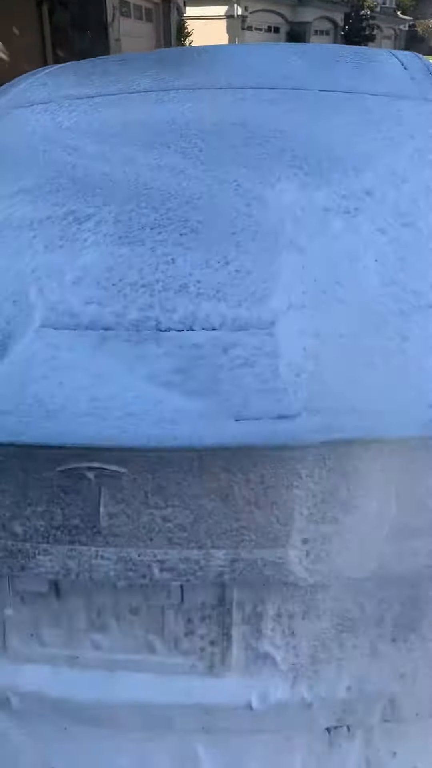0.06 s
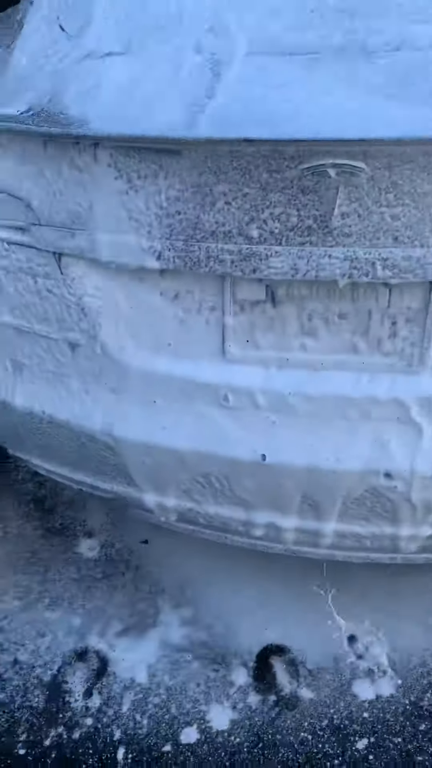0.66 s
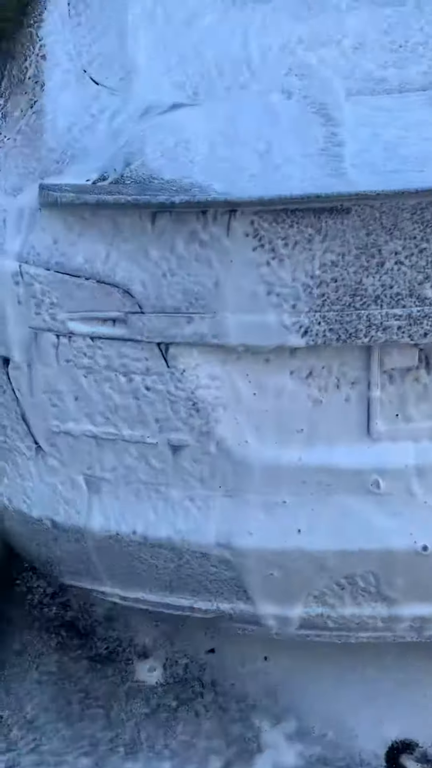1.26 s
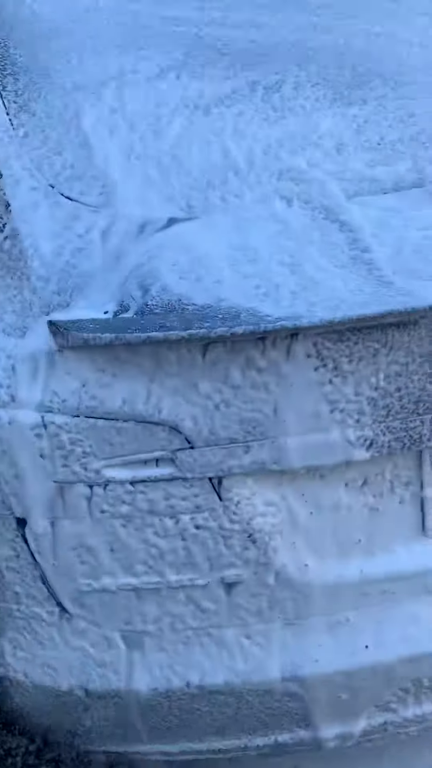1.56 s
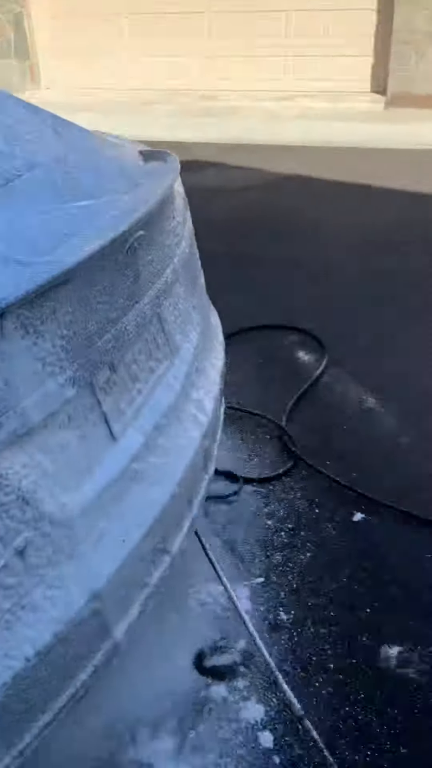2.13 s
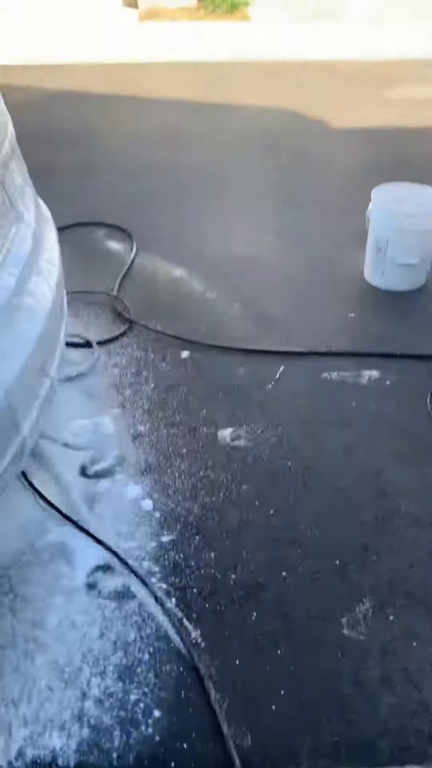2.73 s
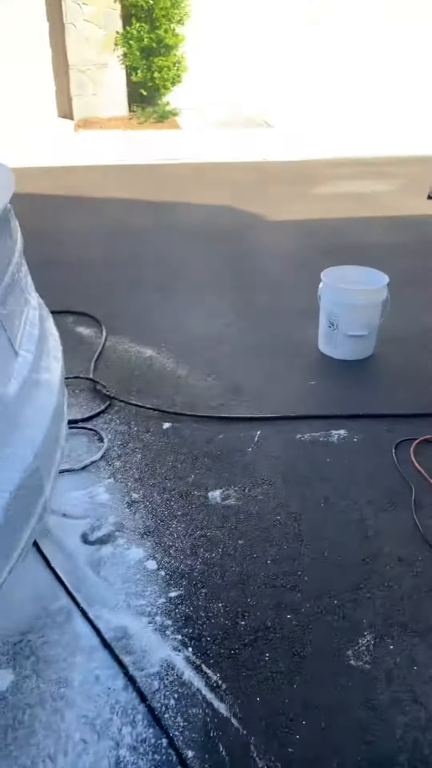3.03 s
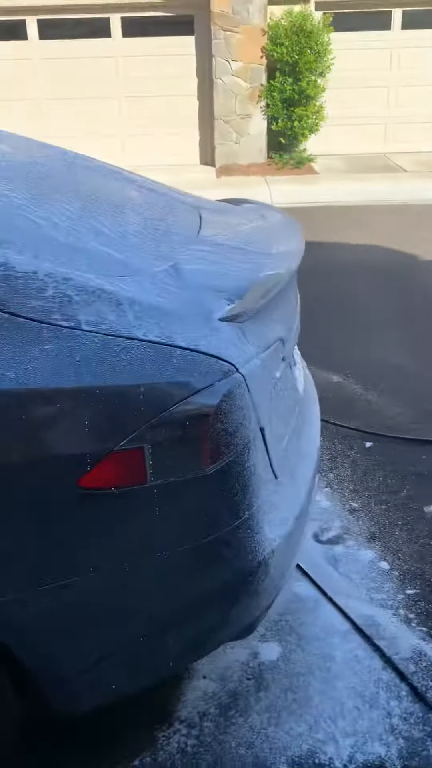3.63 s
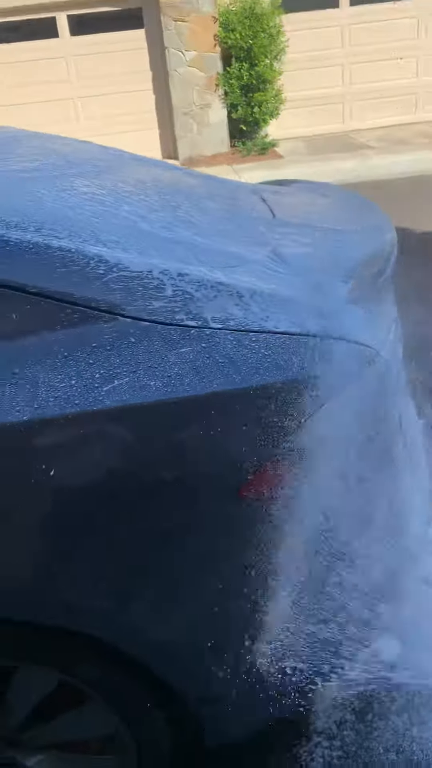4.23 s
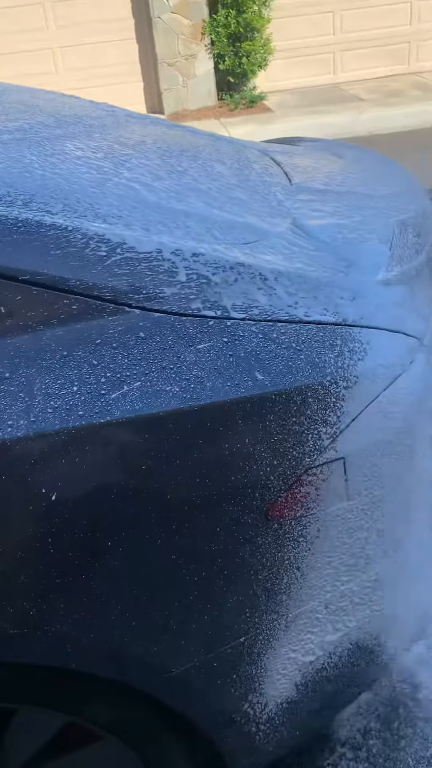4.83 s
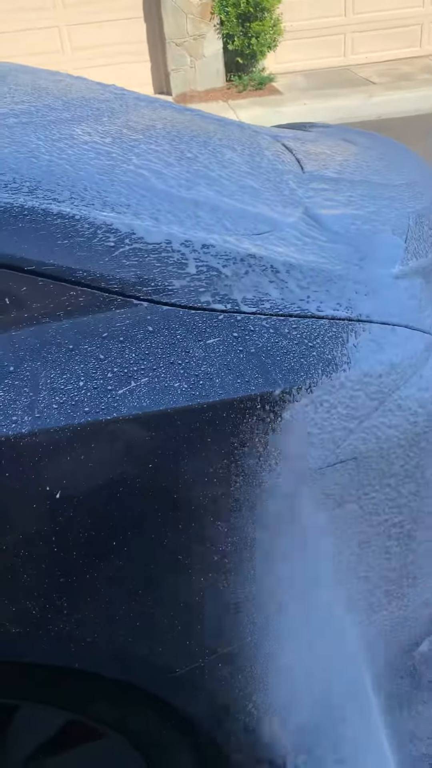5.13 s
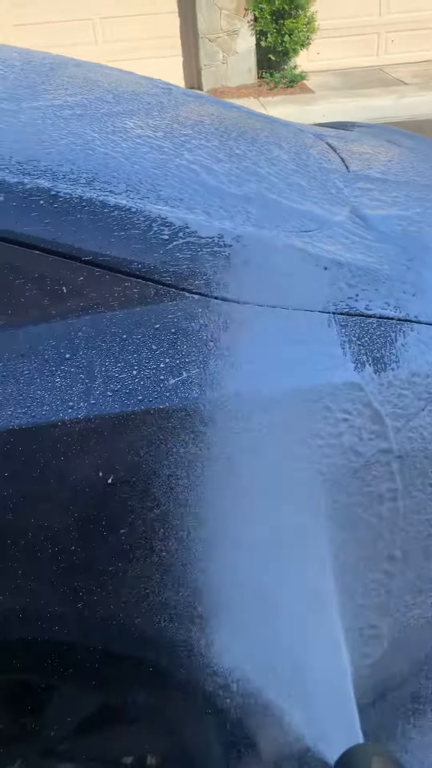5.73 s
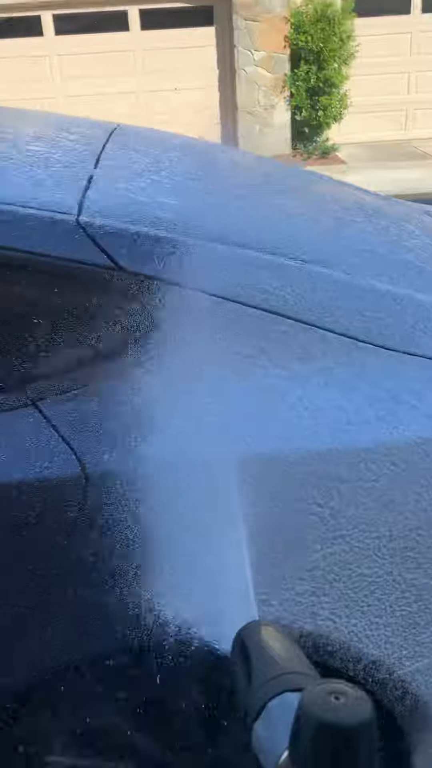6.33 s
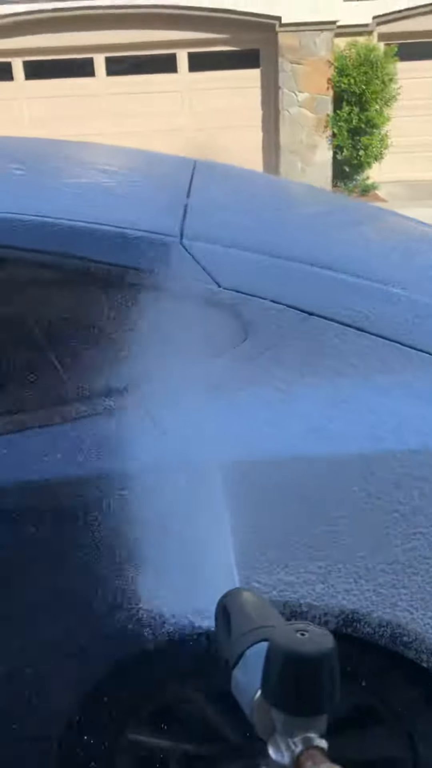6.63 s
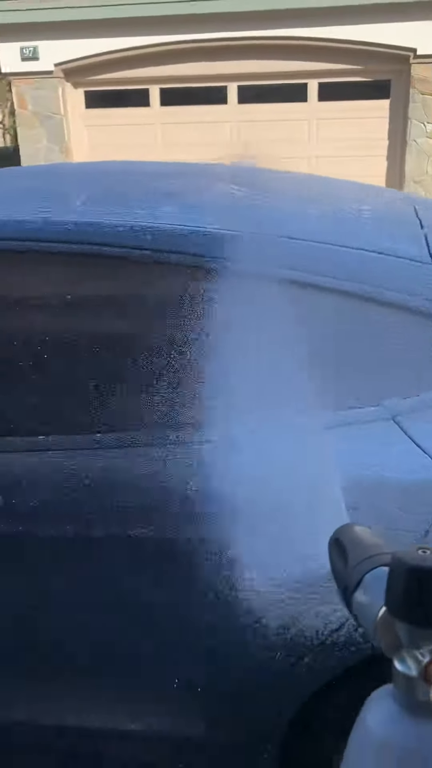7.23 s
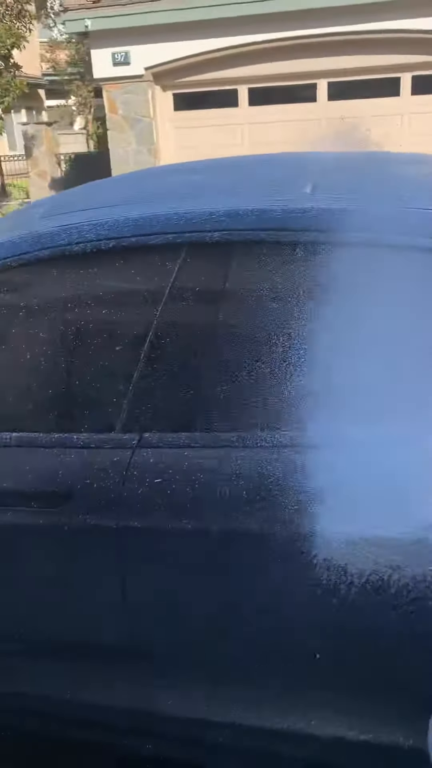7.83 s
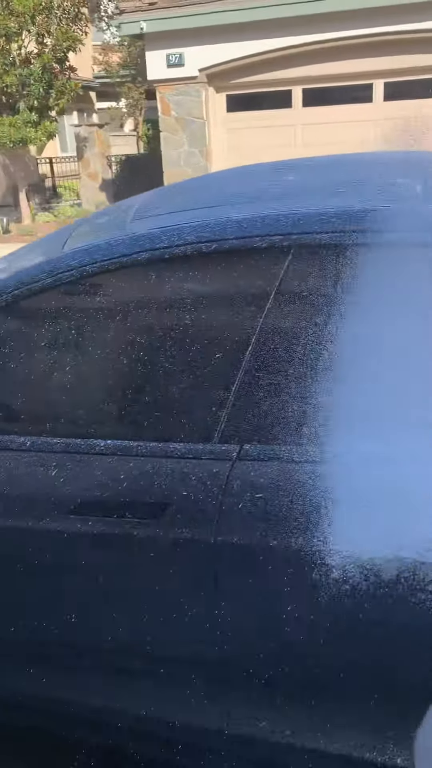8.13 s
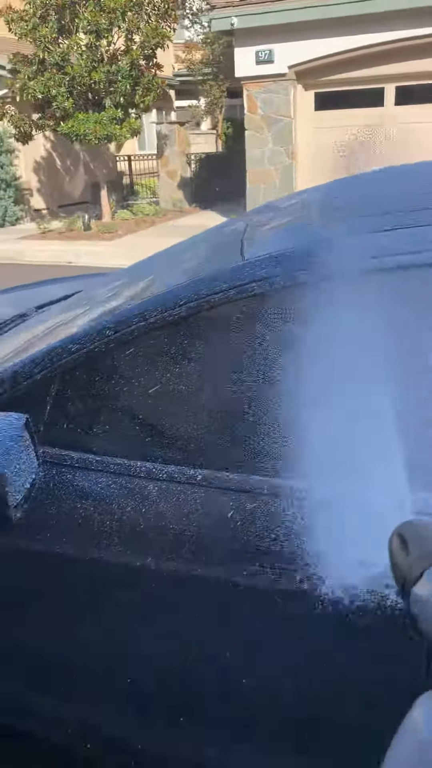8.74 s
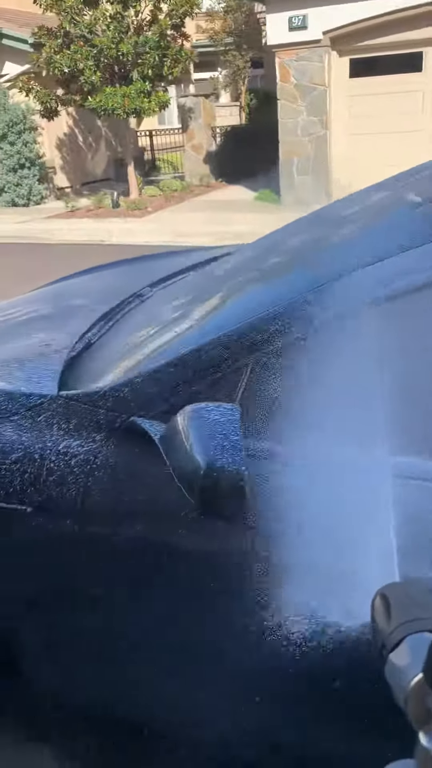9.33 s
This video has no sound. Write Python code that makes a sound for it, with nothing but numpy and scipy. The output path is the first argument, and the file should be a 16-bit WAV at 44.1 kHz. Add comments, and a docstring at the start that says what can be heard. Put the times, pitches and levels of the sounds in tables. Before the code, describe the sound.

A pressure washer sprays foam onto a car on a driveway, heard from just behind the nozzle: a midrange roar and bright hiss over a low thudding engine some way off. At about 0.4 seconds the spray cuts off with a short sputter. The engine runs slightly faster, surging about twice a second before gradually settling. In the pause, foam fizzes faintly, air softly bumps the microphone between 1 and 2 seconds, and shoes scuff the wet ground with small splatters from about 1.5 to 3 seconds. A few light clicks come near 2.7 seconds. At about 4.1 seconds the valve pops sharply and the jet starts again, while the engine slows back into its loaded thud. The spray roars, hisses and splashes on the panels, its tone shifting gently as it sweeps along the car, continuing to the end at about 9.4 seconds.

```python
"""A pressure washer lays foam on a car in a driveway, heard from just behind the lance.
First air and soap roar in the nozzle and the fan of foam hisses and splashes, over a thudding engine.
The trigger is let go: the relieved engine runs faster and smoother, its governor hunting at first.
On the walk round the car, foam fizzes, shoes scuff the wet ground and air bumps the microphone.
At about four seconds the valve pops, the jet sprays again and the engine slows under the load."""
import sys
import numpy as np
from scipy import signal
from scipy.fft import rfft, irfft, next_fast_len
from scipy.io import wavfile
from scipy.ndimage import uniform_filter1d, map_coordinates

SR = 44100
rng = np.random.default_rng(int(sys.argv[2]) if len(sys.argv) > 2 else 0)


def file_out(sig):
    """Save sig as 16-bit WAV at sys.argv[1]."""
    # one column per channel
    cols = np.atleast_2d(sig).T
    # limit, then scale
    lim = np.clip(cols, -1, 1)
    pcm = np.round(lim * 32767).astype(np.int16)
    wavfile.write(sys.argv[1], SR, pcm)


N = 413195
TIME = np.arange(N) / SR
RELEASE_S, PULL_S = 0.361, 4.1255  # the trigger is let go, and pulled again
SURGE_S, SURGE_PERIOD_S = .96, .468  # the governor's first full surge, and the time between surges


def amp(db):
    """Decibels to gain."""
    return 10 ** (np.asarray(db) / 20)


def unit(x):
    """x at rms 1."""
    return x / np.sqrt(np.mean(x ** 2) + 1e-20)


def bump(x, centre, width):
    """A bell of height 1."""
    return np.exp(-.5 * ((x - centre) / width) ** 2)


def swells(rows):
    """A gain envelope of bells, one per (peak_s, half_length_s, level_db) row."""
    return sum(amp(db) * bump(TIME, s, half_length) for s, half_length, db in rows)


def curves(rows, t=TIME):
    """Each column after the first, read at the times t."""
    times, *columns = np.transpose(rows)
    return [np.interp(t, times, column) for column in columns]


def wobble(rate):
    """A smooth random curve, rate knots a second."""
    knots = rng.standard_normal(int(N * rate / SR) + 4)
    steps = np.arange(0, N * rate / SR + 1, 1 / 8)
    return np.interp(TIME * rate, steps, map_coordinates(knots, [steps]))


def white():
    """Fresh white noise."""
    return rng.standard_normal(N)


def drops(rate, share):
    """White noise in which a share of the power comes as single drop impacts, rate a second."""
    hits = unit(white() * np.sqrt(rng.poisson(rate / SR, N)))
    return np.sqrt(share) * hits + np.sqrt(1 - share) * white()


def filtered(x, response):
    """x times a response of frequency."""
    size = next_fast_len(N + SR // 2)
    return irfft(rfft(x, size) * response(np.fft.rfftfreq(size, 1 / SR)), size)[:N]


def coloured(x, spectrum):
    """x at rms 1 through an EQ curve that falls steeply beyond its ends."""
    freqs, gains_db = np.transpose(spectrum)

    def response(hz):
        gain = amp(np.interp(np.log(hz + 1), np.log(freqs + 1), gains_db))
        return gain / (1 + (freqs[0] / (hz + 1) / 1.2) ** 8) / (1 + (hz / freqs[-1] / 1.2) ** 8)
    return unit(filtered(x, response))


def swept(x, shape_db, patchy_db):
    """x at rms 1 through a moving EQ shape_db(hz, t), with the drifting patches of close reflections."""
    hz, t, frames = signal.stft(x, SR, nperseg=2048)
    patches = uniform_filter1d(rng.standard_normal(frames.shape), size=3, axis=0)
    patches = unit(uniform_filter1d(patches, size=21, axis=1))
    frames *= amp(shape_db(hz[:, None], t) + patchy_db * patches)
    return unit(signal.istft(frames, SR, nperseg=2048)[1][:N])


# narrow peaks and notches as the lance passes the car: peak_s, half_length_s, centre_hz, gain_db
PASSING_PEAKS = [(5.15, .15, 1130, 5), (5.15, .25, 1670, -6), (6.35, .12, 1320, 6), (6.72, .12, 880, 5),
                 (7.25, .18, 1785, 6), (7.75, .12, 1785, 5), (8.3, .13, 2060, 4), (8.6, .25, 1770, -5),
                 (8.9, .4, 950, -6), (7.5, .12, 3990, 6), (7.55, .15, 3410, -7), (7.68, .1, 3325, 6),
                 (9.05, .13, 3350, 7)]

def resonances(*tracks):
    """The hollow between lance and car as a moving EQ: gliding peaks, one per track, and passing ones."""
    def shape_db(hz, t):
        passing = sum(db * bump(t, s, half_length) * bump(hz, centre, width=26)
                      for s, half_length, centre, db in PASSING_PEAKS)
        gliding = (curves(track, t) for track in tracks)
        return passing + sum(db * bump(hz, centre, width=28) for centre, db in gliding)
    return shape_db


# the body of the roar: freq_hz, gain_db
ROAR_EQ = [(330, -16), (450, -12.5), (560, -9), (680, -3), (790, -2.5), (950, -3.5), (1150, -3), (1390, -2),
           (1550, -4.5), (1800, -10.5), (2050, -12), (2350, -24), (2600, -22)]
# two resonances gliding through the roar: time_s, centre_hz, gain_db
ROAR_LOW_PEAK = [(0, 700, 3), (.35, 820, 3), (4.14, 720, 6), (4.3, 820, 3), (4.7, 790, 1), (5.25, 820, 1.5),
                 (5.65, 760, 4), (5.95, 760, 8), (6.4, 780, 2), (7, 725, 2), (7.7, 690, 2.5),
                 (8.25, 765, 3), (8.6, 840, 5.5), (9.37, 855, 5)]
ROAR_HIGH_PEAK = [(0, 1350, 6), (.3, 1410, 8), (4.2, 1440, 5), (4.5, 1425, 6), (4.9, 1490, 6),
                  (5.45, 1460, 6), (5.72, 1378, 6.5), (6.02, 1360, 7.5), (6.25, 1390, 1), (6.55, 1450, 8),
                  (6.8, 1385, 3), (7.05, 1297, 6), (7.7, 1300, 0), (8.1, 1240, 5), (8.3, 1275, 7),
                  (8.45, 1375, 2), (8.7, 1402, 6), (9.05, 1390, 1), (9.3, 1285, 5.5)]

def nozzle_roar():
    """Air and soap churn in the nozzle: a steady midrange roar."""
    churn = coloured(white(), ROAR_EQ)
    return amp(-27.5) * swept(churn, resonances(ROAR_LOW_PEAK, ROAR_HIGH_PEAK), patchy_db=1.8)


# the nozzle's bright ring: freq_hz, gain_db
RING_EQ = [(2500, -47), (2900, -14), (3150, -6.5), (3400, -1), (3700, 0), (4000, -1), (4250, -16.5),
           (5200, -12)]
# two resonances gliding through the ring: time_s, centre_hz, gain_db
RING_LOW_PEAK = [(0, 3620, 2), (4.2, 3730, 3), (4.6, 3670, 2), (5.1, 3500, 2), (5.9, 3380, 1),
                 (6.7, 3580, 1), (7.05, 3530, 5), (7.3, 3485, 8), (7.6, 3510, 6), (8.1, 3560, 3),
                 (8.8, 3555, 6), (9.1, 3590, 6), (9.37, 3500, 4)]
RING_HIGH_PEAK = [(0, 3950, 3), (4.3, 3950, 0), (4.9, 3900, 1), (5.2, 3930, 6), (5.6, 3920, 1),
                  (6.1, 3820, 4), (6.5, 3730, 5.5), (7.5, 3770, 0), (8.4, 3790, 1), (8.75, 3815, 5),
                  (9.37, 3850, 2)]
# the ring's fader: time_s, level_db
RING_LEVELS = [(0, -30), (.4, -33), (4.2, -35.5), (4.55, -34), (5.1, -37), (5.6, -35), (6.5, -39.5),
               (7.9, -32), (9.37, -31.5)]

def nozzle_ring():
    """The nozzle rings, louder as it comes up beside the microphone."""
    level_db, = curves(RING_LEVELS)
    ring = coloured(white(), RING_EQ)
    return amp(level_db) * swept(ring, resonances(RING_LOW_PEAK, RING_HIGH_PEAK), patchy_db=2.6)


# moving bands in the hiss: peak_s, half_length_s, centre_hz, glide_hz_per_s, gain_db
SHEEN_BANDS = [(.17, .12, 13900, 0, 3.5), (.3, .15, 12200, 0, -3), (4.18, .06, 9950, 0, -6),
               (4.7, .13, 10400, 1100, -3), (4.98, .12, 13400, 1500, 4.5), (5.03, .14, 11900, 0, -3.5),
               (5.29, .09, 14300, 0, 3), (5.44, .08, 11500, -9000, -8), (6.25, .3, 12300, 0, -2.5),
               (6.5, .5, 5100, 0, -2), (7.9, .5, 11200, 0, -2.5), (8.4, .4, 7300, 900, -3),
               (8.5, .5, 9370, 0, 5), (7.7, .35, 6600, 600, -2), (8.1, .45, 5200, 0, 1.5)]

def sheen(hz, t):
    """Bands of the hiss dim or brighten, in dB, as the fan sweeps over the body."""
    return sum(db * bump(t, s, half_length) * bump(hz, centre + glide * (t - s), width=680)
               for s, half_length, centre, glide, db in SHEEN_BANDS)


# the fan's hiss, its airy mist and its splash on the panels: freq_hz, gain_db
HISS_EQ = [(2900, -38), (4200, -5), (4600, -5), (5200, -2), (5900, -0.5), (6260, 2.8), (6550, -0.7),
           (7020, 1.7), (7400, -1.2), (8000, -3), (8450, -4.2), (9200, 0), (11200, -2), (12500, -11),
           (15000, -22)]
MIST_EQ = [(9000, -11.5), (11200, -8.5), (12300, -2), (13200, -3.5), (14200, -1), (15100, -2),
           (15800, -1.5)]
SPLASH_EQ = [(900, -25), (1900, 1), (2600, 3.5), (4600, 13), (6500, -5), (12000, -24)]
# the fan turns to and from the microphone in each burst: time_s, hiss_db, mist_db
FIRST_BURST = [(0.03, -28, -25.5), (0.278, -27, -23.5), (0.35, -30, -22)]
SECOND_BURST = [(4.16, -32, -40), (4.23, -30.5, -37), (4.27, -30.5, -26), (4.35, -28.5, -25.5),
                (4.55, -29.5, -30.5), (4.7, -33.5, -38), (4.85, -29.5, -37), (4.95, -25.5, -25.5),
                (5.32, -26.5, -19.5), (5.41, -27, -23), (5.73, -27, -20.5), (6.29, -29.5, -27.5),
                (7.41, -28, -27.5), (8.03, -26, -24.5), (8.69, -27.5, -21.5), (9.37, -26.5, -25.5)]
# hard splashes as the jet collapses, lands and crosses the rear corner: peak_s, half_length_s, level_db
HARD_SPLASHES = [(.36, 0.087, -31.5), (4.175, 0.049, -43), (5.467, 0.095, -34)]

def foam_fan(mist_boost_db=3):
    """The fan of foam hisses and its drops splash on the panels; the splash swings wider than the hiss."""
    hiss_db, mist_db = curves(np.vstack([FIRST_BURST, SECOND_BURST]))
    hiss = swept(coloured(drops(5000, share=0.21), HISS_EQ), sheen, patchy_db=2)
    mist = swept(coloured(drops(5000, share=0.42), MIST_EQ), sheen, patchy_db=2)
    splash = coloured(drops(1500, share=0.35), SPLASH_EQ)
    splash_gain = amp(-45.5 + 2.2 * (hiss_db + 28)) + swells(HARD_SPLASHES)
    return amp(hiss_db) * hiss + amp(mist_db + mist_boost_db) * mist + splash_gain * splash


def flow(lag_s, t60_s):
    """Jet strength: it dies away from lag_s after the release, and snaps back with the pull."""
    dying = amp(-60 * np.maximum(TIME - RELEASE_S - lag_s, 0) / t60_s)
    return np.maximum(dying, np.clip((TIME - PULL_S) / 0.0043, 0, 1))


def foam_jet(cycle):
    """The trigger gates nozzle and fan; pump strokes and churning foam make the fan flutter."""
    nozzle = flow(lag_s=0, t60_s=0.11) * (nozzle_roar() + nozzle_ring())
    fan = flow(lag_s=0.012, t60_s=0.15) * foam_fan()  # foam still in the air goes on landing
    flutter_db = 0.2 * np.cos(4 * np.pi * cycle) + 0.47 * wobble(30) + 0.44 * wobble(250)
    return nozzle + amp(flutter_db) * fan


# the bounce off the car's side as the lance moves along it: time_s, delay_s
PANEL_DELAYS = [(0, .0027), (.35, .0036), (4.2, .0034), (5, .00262), (5.35, .00255), (5.8, .0029),
                (6.3, .00308), (7.1, .00393), (7.75, .00435), (8.55, .00366), (8.9, .00354), (9.37, .00372)]

def panel_echo(jet, gain=0.19, low_hz=780, dull_hz=2300):
    """The curved, foamy panel returns mostly mids; its echo combs the jet, gliding with the distance."""
    delay_s, = curves(PANEL_DELAYS)
    mids = filtered(jet, lambda hz: ((1 + (hz / dull_hz) ** 4) * (1 + (low_hz / (hz + 1)) ** 8)) ** -.5)
    return gain * map_coordinates(mids, [np.arange(N) - delay_s * SR])


def pump_load(lag_s=0, unload_s=.54, reload_s=4.26, ramp_s=.14):
    """1 while the pump works, 0 while it is relieved; it switches a moment after the trigger."""
    t = TIME - lag_s
    relieved = np.minimum(t - unload_s, reload_s - t) / ramp_s
    return np.clip(.5 - relieved, 0, 1)


def surge(fade_s=1.9):
    """The governor's fading swing about the relieved speed, -1 to 1."""
    age = TIME - SURGE_S
    fade = np.exp(-np.maximum(age, 0) / fade_s)
    return (1 - pump_load()) * fade * np.cos(2 * np.pi * age / SURGE_PERIOD_S)


def engine_cycle(loaded_hz=15.503, relieved_hz=17.005, surge_hz=.27):
    """Firings counted so far, two shaft turns each: without load the engine runs faster, and surges."""
    firing_hz = relieved_hz + (loaded_hz - relieved_hz) * pump_load() + surge_hz * surge()
    return np.cumsum(firing_hz) / SR + .66


# the exhaust under load: firing_harmonic, gain_db
THUD_HARMONICS = [(1, -14), (2, -6), (3, 0), (4, 6.5), (5, 1.5), (6, -24), (7, -9), (8, -7), (9, -4),
                  (10, -6.5), (11, -9), (12, -32), (13, -19.5), (14, -41), (15, -44), (16, -21), (17, -28),
                  (18, -24.5), (19, -21), (20, -32)]

def loaded_thud(cycle):
    """One pressure pulse a firing: its harmonics take the phases of a causal ring."""
    orders, gains_db = np.transpose(THUD_HARMONICS)
    cepstrum = irfft(np.log(amp(np.interp(np.arange(129), orders, gains_db))))
    cepstrum[len(cepstrum) // 2:] = 0
    phase = 2 * rfft(cepstrum).imag
    return unit(sum(amp(db) * np.cos(2 * np.pi * k * cycle + phase[k]) for k, db in enumerate(gains_db, 1)))


# the exhaust with the pump relieved: firing_harmonic, gain_db
CHUG_HARMONICS = [(1, -30), (2, -1.5), (3, -22), (4, 1), (5, -7), (6, 2), (7, -24), (8, -5.5), (9, -5.5),
                  (10, -6.5), (11, -17), (12, -9), (13, -19), (14, -11.5), (15, -17), (16, -17), (17, -29),
                  (18, -20.5), (19, -26), (20, -11.5), (21, -30), (22, -20), (23, -19), (24, -19.5),
                  (25, -29), (26, -20.5), (27, -26), (28, -17)]

def relieved_chug(cycle, beat, limp_db=3.5, lag_cycles=.25):
    """Soft, rough puffs, one a shaft turn; odd harmonics make them limp, most between surges."""
    puffs = np.zeros(N)
    for k, db in CHUG_HARMONICS:
        level_db = db + 1.3 * wobble(9) - limp_db * beat * (k % 2)
        puffs += amp(level_db) * np.sin(2 * np.pi * k * (cycle - lag_cycles + .018 * wobble(5)))
    return unit(puffs)


# exhaust lows and muffler tone on the walk round the car: time_s, throb_db, muffler_db
EXHAUST_LEVELS = [(0, -33.5, -36.5), (.45, -33.5, -36.5), (.65, -36, -45), (1, -35.5, -44.5),
                  (1.6, -37.5, -41.5), (2.5, -32.5, -42.5), (4.3, -37, -41.5), (4.48, -31.5, -40),
                  (7.2, -33, -39.5), (9.37, -37.5, -40.5)]
# the exhaust's boom behind the car: time_s, level_db
BOOM_LEVELS = [(0, -43), (.5, -39), (.65, -45), (1, -38), (1.32, -43), (1.45, -46), (1.6, -46), (2.05, -55),
               (2.5, -65)]
# the boom's resonances: centre_hz, width_hz, gain_db
BOOM_PEAKS = [(138, 8.8, 1.5), (291.6, 7, 7)]

def exhaust(cycle, load, hunting, crossover_hz=117, hum_hz=68):
    """Thuds crossfade to puffs as the load drops, heard as a low throb, a muffler tone and a boom."""
    beat = np.cos(2 * np.pi * (TIME - SURGE_S) / SURGE_PERIOD_S)
    pulses = np.sqrt(load) * loaded_thud(cycle) + np.sqrt(1 - load) * relieved_chug(cycle, beat)
    pulses *= amp((.4 + 2 * hunting) * wobble(25))
    throb_db, muffler_db = curves(EXHAUST_LEVELS)
    boom_db, = curves(BOOM_LEVELS)
    lows = filtered(pulses, lambda hz: 1 / (1 + (hz / crossover_hz) ** 12))
    beating_hum = filtered(unit(lows), lambda hz: bump(hz, hum_hz, width=9))
    beat_db = 4.5 * (1 - load) * beat  # off load, the hum swells and sinks about twice a second
    throb = amp(throb_db) * (unit(lows) + (amp(beat_db) - 1) * beating_hum)
    muffler = amp(muffler_db + 1.5 * surge() - 2 * hunting) * unit(pulses - lows)
    boom = filtered(pulses, lambda hz: sum(amp(db) * bump(hz, centre, width)
                                           for centre, width, db in BOOM_PEAKS))
    return throb + muffler + amp(boom_db) * unit(boom)


def shaft_whirr(cycle, waver_db=3):
    """Shaft harmonics: the part of the clatter that repeats at every turn, each wavering on its own."""
    return unit(sum(amp(waver_db * wobble(2.5)) * np.sin(2 * np.pi * (2 * k * cycle + rng.random()))
                    / np.hypot(k, 12) for k in range(7, 35)))


# two bands of the clatter: time_s, low_gain_db, high_gain_db
CLATTER_BAND_GAINS = [(.5, 1, .5), (.75, -1, -.5), (1.38, 0, 1.5), (1.62, -3.5, -.5), (1.9, 0, 0),
                      (2.1, 2.5, 0), (2.32, 2.5, 1.5), (2.56, 1, -2), (2.92, 1, 2), (3.1, 0, .5),
                      (3.35, .5, 1.5), (3.6, 2.5, -2.5), (3.85, 2, 1), (4.2, 0, 0)]

def clatter_swells(hz, t):
    """The clatter's low and high bands swell and fade: a moving EQ in dB."""
    low_db, high_db = curves(CLATTER_BAND_GAINS, t)
    return low_db * bump(hz, 560, width=120) + high_db * bump(hz, 1150, width=330)


# the engine's mechanical noise: freq_hz, gain_db
CLATTER_EQ = [(190, -9), (270, -2), (400, -5.5), (600, -3), (800, -4.5), (1100, -5), (1400, -8.5),
              (1800, -25), (2600, -43)]

def clatter(cycle, load):
    """Noise pulses at each shaft turn over the whirr; both swell with surges and in the open."""
    swell_db = 2.5 * bump(TIME, 1.8, width=1) + 1.5 * surge()  # the bell: open ground behind the car
    knocks = (1 + 0.08 * np.cos(4 * np.pi * cycle)) * coloured(white(), CLATTER_EQ)
    knocks = swept(knocks, clatter_swells, patchy_db=1.5)
    whirr = swept(shaft_whirr(cycle), clatter_swells, patchy_db=-0.5)
    return amp(-44.8 + swell_db - 0.72 * load) * knocks + amp(-45.5 + swell_db - 9.8 * load) * whirr


# the engine's low noise bed: freq_hz, gain_db
RUMBLE_EQ = [(15, -12), (30, -6), (130, -1.5), (260, -11.5), (500, -33)]

def rumble(load, hunting):
    """A low rumble that grows while firing is uneven."""
    return amp(-48 + 5 * hunting - 2.3 * load) * coloured(white(), RUMBLE_EQ)


# the muffler's drone: firing_harmonic, gain_db
DRONE_HARMONICS = [(10, -2), (12, -1), (14, 0), (18, -9), (20, -10), (22, -10)]
# its swells: peak_s, half_length_s, level_db
DRONE_SURGES = [(.68, .05, -42), (.96, .12, -36.5), (1.34, .1, -43), (1.62, .12, -42), (2, .07, -40),
                (2.82, .09, -39.5)]

def muffler_drone(cycle, waver_db=3):
    """While the governor hunts, the muffler drones on a few harmonics."""
    waver = amp(waver_db * wobble(12.04))
    tone = sum(amp(db) * np.sin(2 * np.pi * (k * cycle + rng.random())) for k, db in DRONE_HARMONICS)
    return waver * swells(DRONE_SURGES) * unit(tone)


def whine(cycle, load, harmonic=46):
    """The relieved engine's faint whine comes and goes, loudest behind the car."""
    gain = amp(-56.5 + 4.5 * wobble(12)) * (1 - load) * bump(TIME, 1.5, width=0.84)
    return gain * unit(np.sin(2 * np.pi * harmonic * cycle))


def engine(cycle):
    """The engine some way off; after the load drops the governor hunts and firing is uneven."""
    load = pump_load(lag_s=0.099)  # the tone follows the load a little late
    hunting = bump(TIME, 1, width=0.5)
    uneven = cycle + (.0015 + .009 * hunting) * wobble(30)
    return (exhaust(uneven, load, hunting) + clatter(cycle, load) + muffler_drone(uneven)
            + rumble(load, hunting) + whine(cycle, load))


# wet rustle and foam fizz: freq_hz, gain_db
RUSTLE_EQ = [(1300, 2.5), (2200, -5), (3300, -5), (4600, -9), (6500, -12), (9000, -19), (14000, -33)]
FIZZ_EQ = [(5000, -16), (8000, -7), (10500, -6), (12500, -1.5), (14000, 0), (15800, -.5)]
# the last foam sputters down, then shoes and hose scuff: peak_s, half_length_s, rustle_db, fizz_db
WET_SCUFFS = [(.43, .03, -40.5, -54), (0.52, 0.021, -44, -49), (1.455, 0.04, -51, -47),
              (1.84, 0.09, -44.5, -49), (2.36, 0.08, -45.5, -50.5), (2.76, 0.08, -50, -57),
              (3.18, .035, -56, -49.5)]

def wet_ground(cycle):
    """Foam runs off and fizzes ever more quietly, and steps scuff; it all pulses with the engine."""
    rustle_gain, fizz_gain = amp(-45.3 - 0.93 * TIME), amp(-52.5 - 0.3 * TIME)
    for s, half_length, rustle_db, fizz_db in WET_SCUFFS:
        stroke = bump(TIME, s, half_length) * amp(-0.5 * wobble(29.7))
        rustle_gain = np.hypot(rustle_gain, amp(rustle_db) * stroke)
        fizz_gain = np.hypot(fizz_gain, amp(fizz_db) * stroke)
    rustle = rustle_gain * coloured(drops(900, share=0.19), RUSTLE_EQ)
    fizz = fizz_gain * coloured(drops(1200, share=0.22), FIZZ_EQ)
    pulsing_db = 0.37 * np.cos(2 * np.pi * cycle) + 0.59 * np.cos(4 * np.pi * cycle)
    return (rustle + fizz) * amp(pulsing_db + .9 * wobble(25))


# wet ticks underfoot and clicks of the handled lance: start_s, level_db, centre_hz, t60_s, width_octaves
TICK_HITS = [(.524, -47, 6000, .09, 1), (2.024, -48, 13800, .03, .12), (2.235, -47, 10000, .04, .3),
             (2.53, -47, 14200, .04, .1), (2.6555, -34, 9400, .01, .14), (2.6555, -36, 2000, .01, .7),
             (2.663, -44, 8500, .01, .4), (2.681, -37, 1300, .03, .3), (2.6845, -34.5, 4200, .011, .2),
             (2.688, -35, 1800, .014, .5), (2.963, -43, 4500, .015, .6)]

def ticks():
    """Each tick is a short burst of noise in its own band."""
    out, t = np.zeros(N), np.arange(SR // 10) / SR
    hz = np.fft.rfftfreq(len(t), 1 / SR)
    for s, db, centre, t60, octaves in TICK_HITS:
        band = bump(np.log2(hz + 1), np.log2(centre), octaves)
        grain = irfft(rfft(rng.standard_normal(len(t))) * band, len(t))
        out[round(s * SR):][:len(t)] += unit(grain) * amp(db - 60 * t / t60)
    return out


# bumps of air on the walk: peak_s, half_length_s, level_db
AIR_BUMPS = [(.98, .09, -45), (1.37, .05, -38.5), (2.07, .1, -42)]
# their deep tone: freq_hz, gain_db
AIR_EQ = [(8, 0), (35, 2), (70, -10), (120, -22)]

def buffets():
    """Air bumps the microphone, soft and low."""
    return swells(AIR_BUMPS) * coloured(white(), AIR_EQ)


# showers of splatter and bubbles: peak_s, half_length_s, bursts_per_s, centre_hz, spread_octaves, level_db
SHOWERS = [(1.85, .1, 110, 3000, .4, -45), (2.2, .09, 110, 3300, .4, -47), (2.77, .09, 90, 3500, .5, -46),
           (1.92, .11, 240, 14000, .1, -46), (2.45, .13, 120, 13000, .12, -48)]

def patter(t60_s=.012, scatter_db=3):
    """Droplets splat underfoot and bubbles pop, each a short damped ring of its own pitch."""
    out, t = np.zeros(N), np.arange(SR // 30) / SR
    for s, half_length, rate, centre, octaves, db in SHOWERS:
        count = int(np.pi * half_length * rate)
        for when, pitch, size in np.clip(rng.standard_normal((100, 3)), -2, 2)[:count]:
            envelope = amp(db + scatter_db * size - 60 * t / t60_s)
            ring = np.sin(2 * np.pi * centre * 2 ** (octaves * pitch) * t)
            out[int((s + half_length * when) * SR):][:len(t)] += envelope * ring
    return out


# the nozzle's modes: pitch_hz, gain_db, t60_s
POP_MODES = [(710, 0, .03), (1000, 0, .009), (1450, -4, .008)]

def valve_pop(low_cut_hz=480):
    """The valve opens and the first slug of water rings the nozzle; the pop carries little bass."""
    age = np.maximum(TIME - PULL_S, 0)
    pop = sum(-amp(db - 60 * age / t60) * np.sin(2 * np.pi * hz * age) for hz, db, t60 in POP_MODES)
    low_cut = signal.butter(3, low_cut_hz, "highpass", fs=SR, output="sos")
    return amp(-14) * signal.sosfilt(low_cut, pop)


def scene():
    """All sources meet at one microphone, the same in both channels."""
    cycle = engine_cycle()
    jet = foam_jet(cycle)
    mono = jet + panel_echo(jet) + engine(cycle)
    mono += wet_ground(cycle) + ticks() + patter() + buffets() + valve_pop()
    return np.array([mono, mono])


def record(dry):
    """The microphone keeps nothing above its band limit."""
    top_hz = 15750
    return np.array([filtered(x, lambda hz: hz < top_hz) for x in dry])


dry = scene()
out = record(dry)
file_out(out)
```